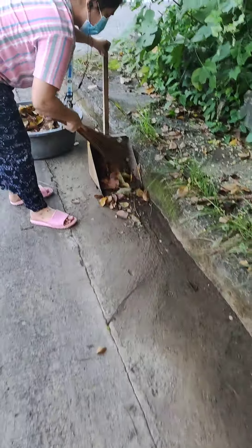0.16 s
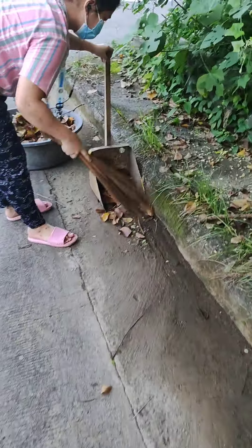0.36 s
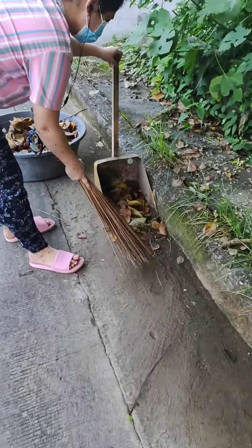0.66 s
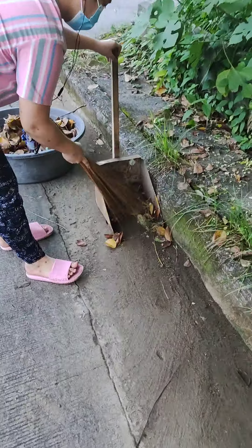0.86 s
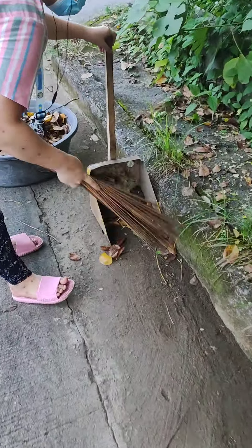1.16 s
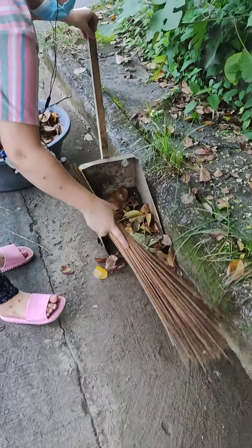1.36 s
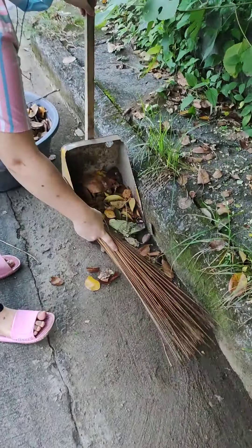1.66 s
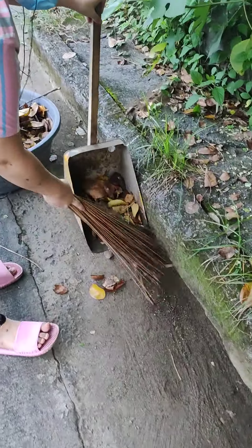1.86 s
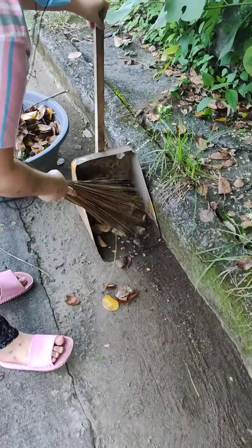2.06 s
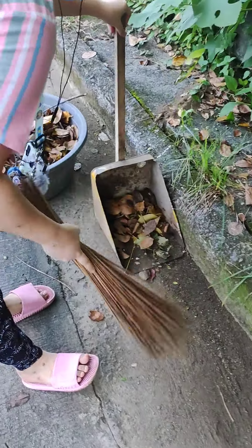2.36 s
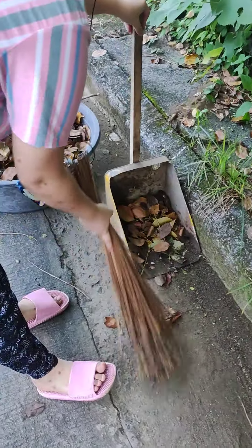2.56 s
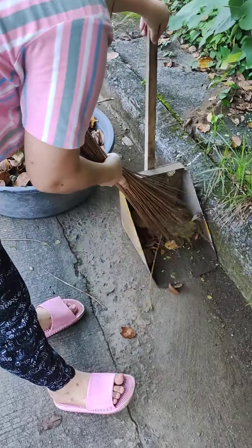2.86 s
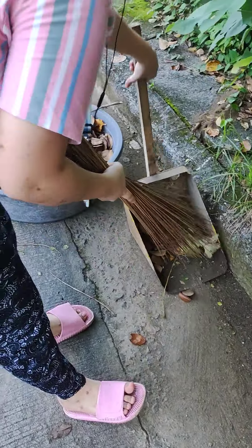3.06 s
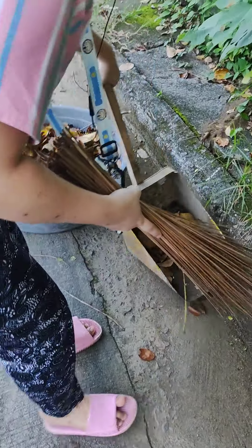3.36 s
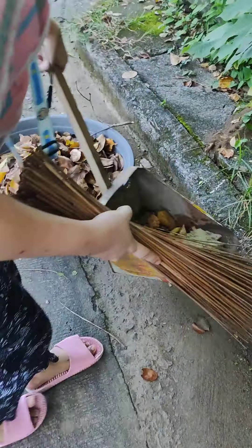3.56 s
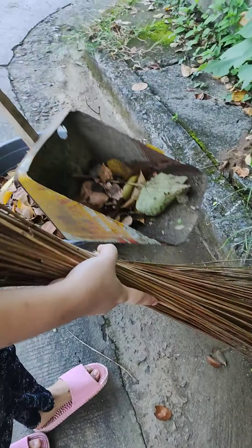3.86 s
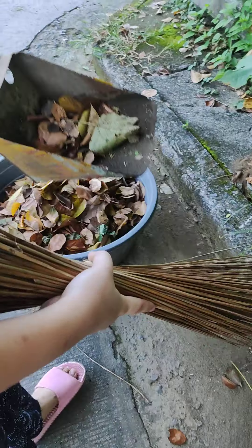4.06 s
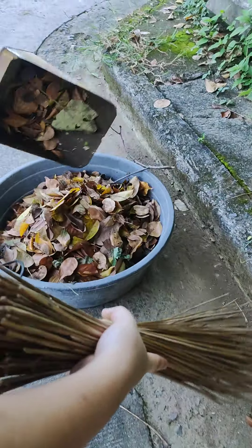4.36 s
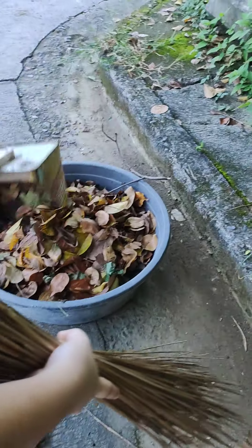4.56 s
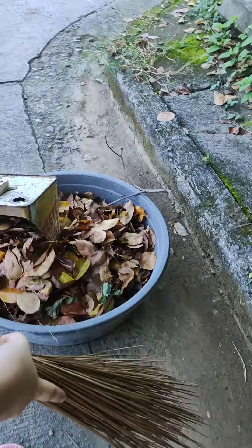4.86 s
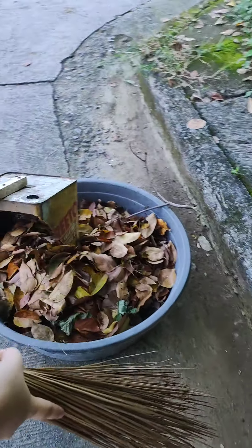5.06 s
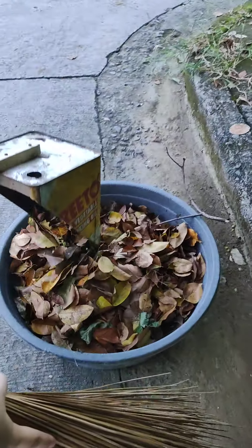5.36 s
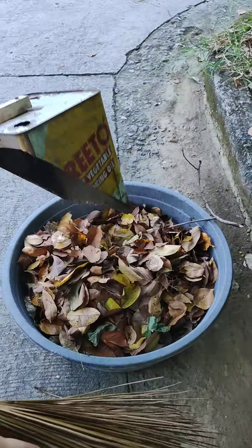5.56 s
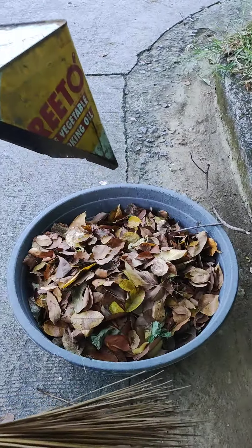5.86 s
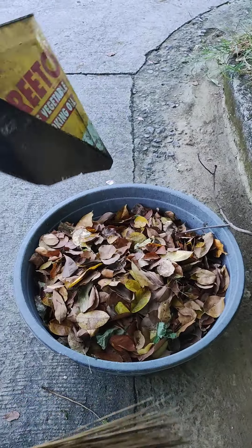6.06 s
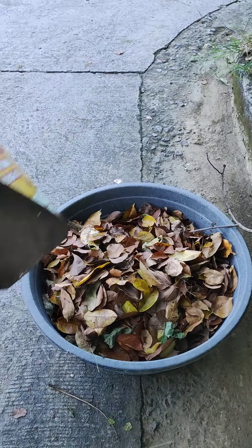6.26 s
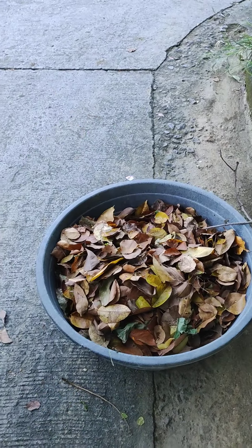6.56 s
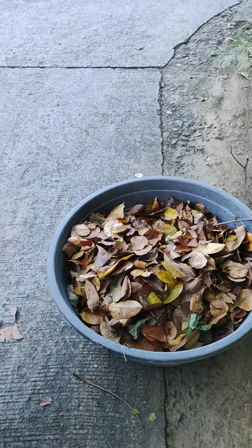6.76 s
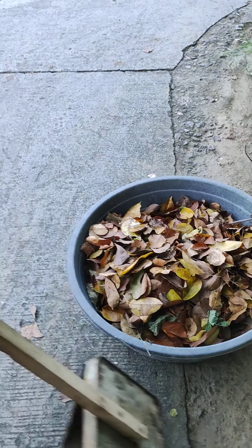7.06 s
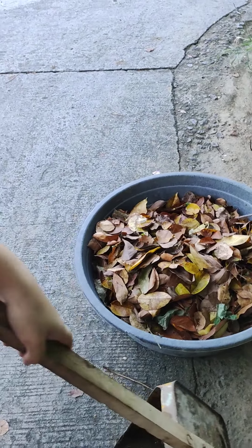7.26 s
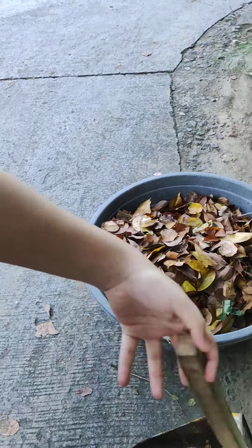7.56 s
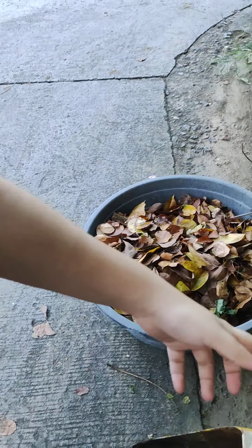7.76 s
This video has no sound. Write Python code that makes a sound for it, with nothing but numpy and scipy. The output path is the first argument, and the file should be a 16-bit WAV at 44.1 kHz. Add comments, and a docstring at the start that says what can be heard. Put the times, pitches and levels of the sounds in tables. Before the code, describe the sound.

A twig broom sweeps dry leaves across concrete into a clanking tin dustpan, which is emptied with knocks and rustles while insects chirp.

```python
"""A twig broom sweeps dry leaves over concrete: showers of tiny clicks, shaped by filters into hiss and scrape.
The leaves go into a tin dustpan, whose knocks are short rattles that make a set of tin tones ring.
Twigs and leaves snap as bursts of cracks; knocks and snaps leave a few dull echoes.
Behind are an insect chorus (clicks in broad resonances), far birds (sliding whistles), a low hum
(wandering sines), deep steady tones (noise in narrow resonances) and distant traffic (smooth noise)."""
import sys
import numpy as np
from scipy import signal
from scipy.io import wavfile
from scipy.ndimage import uniform_filter1d, minimum_filter1d

SR = 44100
rng = np.random.default_rng(int(sys.argv[2]) if len(sys.argv) > 2 else 0)


def nominal_scale(level):
    """Amplitude ratio for a level in decibels (scalar or array-like)."""
    x = np.asarray(level, float) / 20
    return 10 ** x


def transcribe(u):
    """Save the signal u as a 16-bit wav file named by the first command-line argument.

    u: samples, shape (n,) or (channels, n), limited to [-1, 1]; the rate is SR.
    q: integer samples, one column per channel.
    """
    v = np.clip(np.atleast_2d(u).T, -1, 1)
    q = np.round(v * 32767).astype(np.int16)
    wavfile.write(sys.argv[1], SR, q)


N = 348390   # length in samples
SLOW = 40    # slow levels have one value every so many samples
LEFT_LAG_SAMPLES = 7   # the work is nearer the right microphone

# tone colour of distant traffic and air: [f/Hz, relative level per hertz/dB]
AIR_COLOUR = [(20, -11), (28, -6), (36, -9), (70, -10), (120, -4), (200, -8.5), (400, -15), (900, -19.5),
              (1500, -25), (2300, -22), (3200, -27), (4000, -32), (8500, -50), (14500, -60)]
# loudness of the wavering hum, before the level of each harmonic: [t/s, level/dB]
HUM_LEVEL = [(0, -57.5), (4.1, -72), (4.4, -52), (4.7, -52.5), (5.2, -56.5), (5.7, -57), (6.1, -60.5),
             (6.4, -52), (6.9, -55.5), (7.2, -54), (7.42, -43), (7.62, -46), (7.82, -44.5), (7.9, -42)]
# harmonics of the hum: [multiple of the base pitch, relative level/dB]
HUM_HARMONICS = [(2, -7.5), (3, -9), (4, -1), (5, -7)]
# deep steady tones of far machinery: [f/Hz, level/dB]
DEEP_TONES = [(26, -55), (52, -59)]
# insect chorus: [f/Hz, width of each resonance/Hz, middle level/dB, clicks per second]
INSECT_GROUPS = [(5080, 1050, -57, 1500), (7050, 850, -56.5, 1500), (9900, 1600, -68, 1500)]
# far bird notes: [t/s, start f/Hz, end f/Hz, level/dB, left over right/dB]
BIRD_NOTES = [(3.868, 5500, 4900, -50, -10), (4.335, 3120, 2860, -42.5, -10), (5.622, 3200, 2850, -50, -4),
              (5.696, 3300, 2820, -36.5, -6), (5.766, 3280, 2900, -38, -6), (6.497, 5800, 6000, -52, -11),
              (6.578, 3600, 3520, -51, 6), (7.545, 6800, 6240, -51, -10), (7.635, 6300, 6100, -52, -9)]
# snaps of twigs and leaves:
# [t/s, level of the ringing/dB, f/Hz, relative treble before a common cut/dB, left over right/dB]
SNAP_EVENTS = [(0.162, -28, 1980, 10, -1), (0.3849, -24.5, 2430, -25, -8), (0.421, -28, 2740, -9, 0.0),
               (1.065, -32, 1990, -14, 9), (1.1006, -32, 3100, -3, 3), (1.166, -30, 3000, -30, -3),
               (1.5095, -26, 1960, 3, 1), (2.5344, -41, 4060, 4, -4), (3.5089, -31, 3180, -27, -9),
               (3.5257, -33, 1920, -20, 3), (3.618, -35, 1720, -10, 9), (4.0148, -36.5, 2830, -4, 0.5),
               (4.2274, -32, 3070, -20, 7), (4.2656, -29, 2720, -25, -4), (4.3864, -36, 1810, -6, 5),
               (5.0914, -36, 2620, -3, 0.5), (6.0581, -35, 2300, -2, -3), (6.1414, -38.5, 2420, -17, -10),
               (6.2124, -37, 2950, -7, -10), (6.8992, -28.5, 2070, -16, 4), (6.908, -34, 2800, -20, -8),
               (6.929, -38, 2010, -16, 2), (6.9582, -45, 2100, -20, -7), (7.2404, -21.5, 2800, -33, -12),
               (7.4839, -30.5, 1800, -17, 2), (7.8478, -32, 1900, -14, 6)]
# knocks of the dustpan:
# [t/s, level before a common cut/dB, rattle length/ms, hardness f/Hz, struck panel f/Hz]
PAN_KNOCKS = [(.383, -25.5, 3.4, 2570, 860), (0.418, -29.5, 58, 1830, 1000), (1.39, -11, 26, 840, 352),
              (1.511, -24, 21, 477, 300), (1.735, -29.5, 140, 1200, 530), (1.793, -18, 7.5, 500, 385),
              (1.816, -7, 38, 1020, 300), (3.24, -15, 20.4, 685, 294), (3.349, -4, 14.5, 2140, 435),
              (4.099, -37, 48, 800, 564), (4.262, -36, 36, 1800, 970), (5.035, -22, 4.5, 1500, 404),
              (5.04, -12, 21, 830, 257), (5.087, -30, 13, 900, 300), (5.13, -27.5, 29, 394, 250),
              (5.169, -27, 60, 500, 265), (6.384, -37, 13, 700, 480), (7.218, -22, 55, 786, 426),
              (7.237, -13.5, 59, 970, 494), (7.287, -18.5, 56, 595, 496), (7.482, -34, 27, 1380, 485),
              (7.751, -32.5, 116, 900, 376), (7.847, -36, 21, 1400, 850)]
# tones of the dustpan when free, before chance shifts them:
# [f/Hz, relative level/dB, time to fall by 60 dB/s]
PAN_TONES = [(132, -11, 0.3), (214, -9, 0.44), (260.6, -7, .2), (300, -8, 0.15), (362.7, -4, 0.22),
             (411.4, -2, 0.22), (465.3, -5.5, 0.19), (541, -8, 0.19), (657, -12, 0.16), (729, -4, 0.18),
             (860, 6.5, 0.049), (954, 0.5, 0.13), (1044, -13.5, 0.21), (1200, -0.5, 0.079),
             (1339, 11.5, 0.028), (1500, -10.5, 0.16), (1570, -7, 0.14), (1957, 11, 0.071),
             (1996, 8.5, 0.043), (2300, 9.5, 0.03), (2370, 18.5, 0.051), (2660, -1, 0.052),
             (2950, 17, 0.039), (3237, 14, 0.049), (3600, 3, 0.033)]
# tone colour of twigs on concrete: [f/Hz, relative level per hertz/dB]
HISS_COLOUR = [(1760, -15), (3000, 5), (3530, 0), (4400, -3.5), (7750, 3), (10800, -6), (13700, -2),
               (14700, -10), (15000, -56)]
# tone colour of scraping leaves: [f/Hz, relative level per hertz/dB]
SCRAPE_COLOUR = [(590, -38), (1000, -11), (1260, -20), (1560, -1.5), (1800, 5.5), (1910, 5.5), (2710, 2.5),
                 (3520, 0), (4400, -8), (5000, -3), (6500, -32), (11000, -120)]
# tone colour of dragged tin: [f/Hz, relative level per hertz/dB]
RUMBLE_COLOUR = [(88, -49), (150, -5), (402, 1.5), (631, -9), (982, 3.5), (1230, -5), (1300, -13),
                 (1690, -51), (2860, -120)]
# long strokes of the broom, then the leaves sliding out of the pan:
# [touch t/s, strongest t/s, lift t/s, hiss level/dB, scrape level/dB]
STROKES = [(-.3, 0.042, 0.46, -37.5, -37), (0.548, 0.87, 0.98, -33.5, -36.5),
           (1.64, 2.058, 2.28, -32.5, -36.5), (2.524, 2.815, 2.845, -28, -34.5),
           (4.552, 4.672, 4.812, -36, -32), (5.108, 5.7, 5.64, -48.5, -45)]
# short rustles and drags: [strongest t/s, rise/ms, fall/ms, scrape level/dB, hiss level/dB]
SHORT_RUSTLES = [(0.164, 77, 80, -32, -35), (.3, 260, 130, -47, -51), (.39, 16, 35, -42, -44),
                 (.457, 57, 73, -35, -36.5), (1.164, 200, 33, -38, -43), (1.065, 15, 40, -52, -57),
                 (1.29, 40, 260, -50.5, -57), (1.47, 45, 60, -54, -49.5), (1.514, 12, 40, -35.5, -43),
                 (1.715, 20, 60, -38, -53), (1.76, 60, 110, -39, -63), (3.066, 36, 86, -50, -50),
                 (3.514, 120, 59, -44.5, -54), (3.625, 15, 92, -42.5, -50.5), (3.675, 86, 34, -43.5, -52),
                 (4.13, 85, 200, -50.5, -62), (4.226, 25, 56, -44, -52), (4.285, 60, 96, -33.5, -41),
                 (5.095, 54, 45, -41, -44), (6.06, 64, 27, -49.5, -59), (6.17, 88, 30, -55, -71),
                 (6.22, 17, 30, -45, -58), (6.33, 75, 74, -40.5, -60), (6.6, 170, 87, -48, -64),
                 (6.9, 12, 23, -38, -48), (6.99, 190, 58, -42.5, -53), (7.246, 35, 97, -29.5, -35),
                 (7.29, 75, 42, -33.5, -54), (7.4, 67, 120, -50, -62), (7.48, 18, 33, -52, -47),
                 (7.76, 33, 100, -44.5, -53), (7.85, 25, 130, -41.5, -48.5)]
# how alike the two microphones hear a sound: [f/Hz, likeness from 0 to 1]
EAR_LIKENESS = [(60, 1), (150, 0.98), (300, 0.93), (640, 0.47), (1400, 0.1), (3000, 0.26), (6000, 0),
                (15000, 0)]
# balance of the two microphones: [f/Hz, left over right/dB]
EAR_BALANCE = [(60, -3.5), (180, 1.5), (550, -1.5), (1650, 4), (4970, -5.5), (15000, -2)]


def rms_one(x):
    """Scales a sound to an average (rms) strength of 1."""
    return x / np.sqrt(np.mean(x ** 2) + 1e-20)


def at_hz(points, hz):
    """Reads a table between its points, with pitch on a log scale."""
    table_hz, values = np.transpose(points)
    return np.interp(np.log(hz), np.log(table_hz), values)


def drift(rate_hz):
    """Random wander of spread 1, made of noise smoothed twice; a higher rate wanders faster."""
    r = np.exp(-2 * np.pi * rate_hz * SLOW / SR)
    noise = rng.standard_normal(N // SLOW + 2002)
    return rms_one(signal.lfilter([1], [1, -2 * r, r * r], noise)[2000:])   # skips the filter's start


def slow_gain(db):
    """Turns a slow level in dB into a gain at every sample."""
    return np.interp(np.arange(N) / SLOW, np.arange(len(db)), nominal_scale(db))


def together_db(levels_db):
    """Level of unrelated sounds heard at once: their powers add."""
    return 10 * np.log10(np.sum(nominal_scale(2 * np.array(levels_db)), axis=0))


def grains(per_s, spread_db, size):
    """Clicks at random moments, of uneven size and sign."""
    sizes = nominal_scale(spread_db * np.minimum(rng.exponential(1, size), 5)) * rng.choice([-1, 1], size)
    return sizes * (rng.random(size) < per_s / SR) + 1e-18


def ring(x, hz, t60):
    """Each click starts a sine that falls by 60 dB in t60 seconds, like a struck object."""
    r = nominal_scale(-60 / (max(t60, .001) * SR))
    w = 2 * np.pi * hz / SR
    return signal.lfilter([0, np.sin(w)], [1, -2 * r * np.cos(w), r * r], x)


def add(out, s, sound, pan_db):
    """Lays a short sound into the mix at s seconds, with left over right in dB."""
    at = round(s * SR)
    placed = sound * nominal_scale([[pan_db / 2], [-pan_db / 2]])
    out[:, at:at + sound.shape[1]] += placed[:, :N - at]


def coloured(source, spectrum, patchy_db, lag, step):
    """Splits four unrelated noises into pitch bands (step in octaves), each with a wandering level; rms 1."""
    out, together = 0, drift(4.1)
    low_end, high_end = spectrum[0][0], spectrum[-1][0]
    octaves = np.arange(0, np.log2(high_end / low_end) + step, step)
    edges = np.minimum(low_end * 2 ** octaves, 16000)
    for k, (low, high) in enumerate(zip(edges, edges[1:])):
        hz = np.sqrt(low * high)
        if at_hz(spectrum, hz) < -40:   # too weak to matter
            continue
        band = signal.butter(2, [low, high], "band", fs=SR, output="sos")
        near, wide = signal.sosfilt(band, source[k % 2])   # neighbouring bands use different noises
        alike = np.clip(at_hz(EAR_LIKENESS, hz), 0, 1)
        both = np.sqrt(1 + alike) * near + np.sqrt(1 - alike) * wide * [[1], [-1]]
        both = np.array([np.roll(both[0], lag), both[1]])
        tilt = nominal_scale(at_hz(EAR_BALANCE, hz) * np.array([[.5], [-.5]]))
        wander = patchy_db * (0.65 * together + drift(19.5))
        out = out + both * tilt * slow_gain(at_hz(spectrum, hz) + wander)
    return rms_one(out)


def traffic():
    """Smooth noise, shaped by filters, for distant traffic and air."""
    noise = rng.standard_normal((2, 2, N))
    return nominal_scale(-47.5) * coloured(noise, AIR_COLOUR, 0.83, lag=0, step=1 / 2)


def low_hum():
    """A few harmonics of one low pitch; the pitch, phases and levels wander."""
    base_hz = 48.13
    phase = 2 * np.pi * np.cumsum(base_hz * slow_gain(0.0806 * drift(2.35))) / SR
    hum = 0
    for order, db in HUM_HARMONICS:
        level = slow_gain(db + 1.7 * drift(7.1))
        phase_wander = 1.45 * np.log(slow_gain(8 * drift(3.8)))
        hum = hum + level * np.sqrt(2) * np.sin(order * phase + phase_wander)
    s, db = np.transpose(HUM_LEVEL)
    return nominal_scale(np.interp(np.arange(N) / SR, s, db)) * hum


def machinery():
    """Noise through very narrow resonances gives deep steady tones."""
    out = 0
    for hz, db in DEEP_TONES:
        tone = ring(rng.standard_normal(2 * N), hz, 3.8)[N:]   # keeps the part that has built up
        out = out + nominal_scale(db) * rms_one(tone)
    return out


def insects():
    """Many singers at once: dense clicks, twice through a broad resonance, with a wavering level."""
    out = 0
    for hz, width_hz, db, per_s in INSECT_GROUPS:
        t60 = np.log(1000) / (np.pi * width_hz)   # a broad resonance dies fast
        clicks = grains(per_s, 0.74, size=(2, N))
        chorus = ring(ring(clicks, hz, t60), hz, t60)
        level = slow_gain(db + 0.65 * drift(11.0) + 1.0 * drift(23))
        out = out + level * rms_one(chorus)
    return out


def birds():
    """Short whistles: sines that slide in pitch under a rounded swell."""
    out = np.zeros((2, N))
    note_ms = 29.3
    length = round(note_ms * SR / 1000)
    for s, start_hz, end_hz, db, pan_db in BIRD_NOTES:
        phase = 2 * np.pi * np.cumsum(np.linspace(start_hz, end_hz, length)) / SR
        note = np.sin(phase) * np.hanning(length) ** 0.44
        add(out, s, nominal_scale(db) * np.array([note, note]), pan_db)
    return out


def echoes(x):
    """Fourteen dull delayed copies per ear at random moments, weaker the later they come."""
    dull = signal.sosfilt(signal.butter(1, 2500, fs=SR, output="sos"), x[::-1])   # the ears swap
    out = np.zeros_like(x)
    for side, lags_s in enumerate(rng.uniform(0.003976, 0.1, (2, 14))):
        for lag_s in lags_s:
            lag = round(lag_s * SR)
            fade = nominal_scale(-60 * lag_s / 0.28)
            out[side, lag:] += fade * rng.choice([-1, 1]) * dull[side, :N - lag]
    return out


def snaps():
    """A tiny burst of cracks makes a twig or leaf ring very briefly and spits some treble."""
    out, ms = np.zeros((2, N)), np.arange(SR // 10) * 1000 / SR
    crackle_ms = 2.3
    treble = signal.butter(2, 4500, "high", fs=SR, output="sos")
    for s, body_db, hz, treble_db, pan_db in SNAP_EVENTS:
        noise = rng.standard_normal(len(ms)) + 0.47 * rng.standard_normal((2, len(ms)))   # shared + own
        cracks = noise * np.exp(-ms / crackle_ms)
        cracks[:, 0] = 1.1   # a definite first crack
        body = ring(cracks, hz, 0.019)
        body = body + 0.62 * ring(cracks, 1.58 * hz, 0.0041) + 0.37 * ring(cracks, 0.51 * hz, 0.017)
        spit = signal.sosfilt(treble, cracks)
        sound = body / np.abs(body).max() + nominal_scale(treble_db - 4.0) * spit / np.abs(spit).max()
        add(out, s, nominal_scale(body_db) * sound, pan_db)
    return out


def contacts(ms, rattle_ms, hard_hz):
    """The force of one knock: a short rattle of touches, duller when the contact is soft."""
    grit_db, grit_hz = -21, 4000   # hard grit in every contact, however soft
    force = grains(2500, 2.5, size=len(ms))
    force[0] = 6   # the first touch
    rise_ms = 900 / hard_hz   # soft contacts build slowly
    build = 1 - np.exp(-(ms + .3) / rise_ms)
    force = force * build * np.exp(-(ms / max(rattle_ms, .5)) ** 2)
    soft = signal.sosfilt(signal.butter(2, hard_hz, fs=SR, output="sos"), force)
    return signal.sosfilt(signal.butter(2, grit_hz, fs=SR, output="sos"), soft + nominal_scale(grit_db) * force)


def dustpan():
    """Each knock makes dented tin ring; its tones come in pairs and shift with the grip."""
    out, ms = np.zeros((2, N)), np.arange(SR // 4) * 1000 / SR
    free_ring = 0.89   # share of its free ringing time that the held pan keeps
    for s, knock_db, rattle_ms, hard_hz, panel_hz in PAN_KNOCKS:
        force = contacts(ms, rattle_ms, hard_hz)
        tin = 0
        chances = rng.standard_normal((len(PAN_TONES), 6))
        for (hz, db, t60), (shift, split, *faces) in zip(PAN_TONES, chances):
            pair = []
            for side in (-1, 1):
                tone_hz = hz * (1 + 0.016 * shift + side * 0.028 * (1 + 0.54 * split))
                sign = side if hz > 680 else 1   # the halves of a high pair swing in opposition
                pair.append(sign * ring(force, tone_hz, t60 * free_ring))
            near_db = 9.3 * np.exp(-(np.log2(hz / panel_hz) / 0.33) ** 2)   # the struck panel speaks up
            face_db = 3 * np.reshape(faces, (2, 2))   # each ear hears its own face
            tin = tin + nominal_scale(db + near_db + face_db) @ np.array(pair)
        small = signal.butter(4, 0.5 * panel_hz, "high", fs=SR, output="sos")   # small panels lack deep bass
        tin = signal.sosfilt(small, [np.roll(tin[0], LEFT_LAG_SAMPLES), tin[1]])
        loudest = np.sqrt(uniform_filter1d(np.mean(tin ** 2, axis=0), size=400).max())   # over about 9 ms
        add(out, s, nominal_scale(knock_db - 5.5) * tin / loudest, pan_db=1)
    return out


def stroke_shape(t, touch, top, lift):
    """Level in dB over one stroke: the twigs touch, press hardest, sag and lift; leaves go on settling."""
    touch_s, touch_db = 0.068, -9.5   # the twigs settle this fast, this far under the strongest moment
    sag_db_per_s, lift_db_per_s = 45, 102   # fading after the strongest moment, and after the lift
    trail_db, trail_db_per_s = -15, 32   # the settling leaves
    rise = np.interp(t, [touch - touch_s, touch, touch + touch_s, top], [-90, -30, touch_db, 0])
    sag = -sag_db_per_s * np.clip(t - top, 0, lift - top)
    fade = sag - lift_db_per_s * np.maximum(t - lift, 0)
    trail = trail_db - trail_db_per_s * np.abs(t - top)
    return rise + together_db([fade, trail])


def effort():
    """Slow levels in dB of hiss, scrape and rumble, built from strokes, rustles and knocks."""
    floor_scrape_db, floor_hiss_db = -59.5, -63.5   # steady faint background scrape and hiss
    edge_db, roundness = 20.5, 1.21   # level lost over a rise or a fall; power that rounds the top
    shiver_db, shiver_db_per_s = -22, 186   # the load shivers after a knock, relative to the knock
    debris_db = -7.5   # grit thrown up by a knock scrapes, relative to the shiver
    tin_db = -6.5   # the tin rumbles under the scrape
    t = np.arange(N // SLOW + 2) * SLOW / SR
    hiss, scrape, shiver = [floor_hiss_db + 0 * t], [floor_scrape_db + 0 * t], []
    for touch, top, lift, hiss_db, scrape_db in STROKES:
        shape = stroke_shape(t, touch, top, lift)
        hiss.append(hiss_db + shape)
        scrape.append(scrape_db + shape)
    for top, rise_ms, fall_ms, scrape_db, hiss_db in SHORT_RUSTLES:
        distance = 1000 * np.maximum((top - t) / rise_ms, (t - top) / fall_ms)
        shape = -edge_db * distance ** roundness
        hiss.append(hiss_db + shape)
        scrape.append(scrape_db + shape)
    for s, knock_db, *_ in PAN_KNOCKS:
        dying = knock_db + shiver_db - shiver_db_per_s * (t - s)
        shiver.append(np.where(t > s, dying, -200))
    scrape_db = together_db(scrape)
    rumble_db = together_db([tin_db + scrape_db] + shiver)
    scrape_and_debris_db = together_db([scrape_db, debris_db + together_db(shiver)])
    return together_db(hiss), scrape_and_debris_db, rumble_db


def broom():
    """Twigs hiss on concrete, leaves scrape in coarser grains, and the tin rumbles as it is dragged."""
    hiss_db, scrape_db, rumble_db = effort()
    catch = slow_gain(1.4 * drift(30))   # the twigs catch and slip together
    fine = catch * grains(6000, 1.9, size=(2, 2, N))
    coarse = catch * grains(2500, 2.53, size=(2, 2, N))
    lag = LEFT_LAG_SAMPLES
    hiss = slow_gain(hiss_db) * coloured(fine, HISS_COLOUR, 0.79, lag, step=1 / 3)
    scrape = slow_gain(scrape_db) * coloured(coarse, SCRAPE_COLOUR, 1.8, lag, step=1 / 4)
    rumble = slow_gain(rumble_db) * coloured(coarse[::-1], RUMBLE_COLOUR, 0.96, lag, step=1 / 2)
    return hiss + scrape + rumble


def scene():
    """Adds up everything in the lane, with echoes of the knocks and snaps."""
    lane = traffic() + low_hum() + machinery()
    struck = dustpan() + snaps()
    return lane + insects() + birds() + struck + nominal_scale(-24) * echoes(struck) + broom()


def limiter(x):
    """Turns the gain down smoothly around peaks that would pass the limit."""
    limit, span_ms = .86, 8
    span = round(span_ms * SR / 1000)
    needed = np.minimum(1, limit / (np.abs(x).max(axis=0) + 1e-9))
    return x * uniform_filter1d(minimum_filter1d(needed, size=2 * span), size=span)


def band_limit(x):
    """A steep low-pass at the top of the band."""
    return signal.sosfilt(signal.butter(12, 15620, fs=SR, output="sos"), x)


def record(dry):
    """A pair of phone microphones: peaks are held down and the highest treble is cut off."""
    limited = limiter(dry)
    top_cut = signal.cheby2(14, 60, 14900, fs=SR, output="sos")   # 60 dB down from 14900 Hz up
    mix = signal.sosfilt(top_cut, limited)
    return band_limit(mix)


dry = scene()
out = record(dry)
transcribe(out)
```